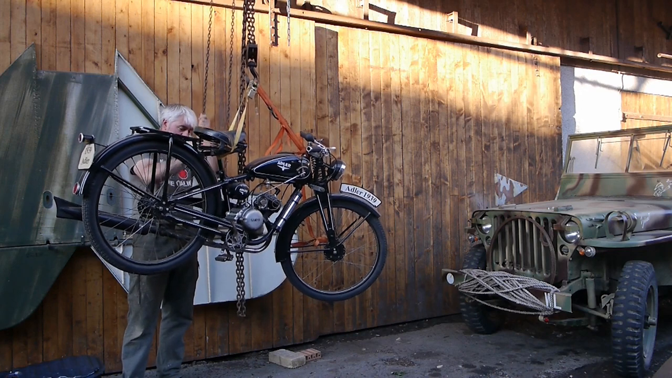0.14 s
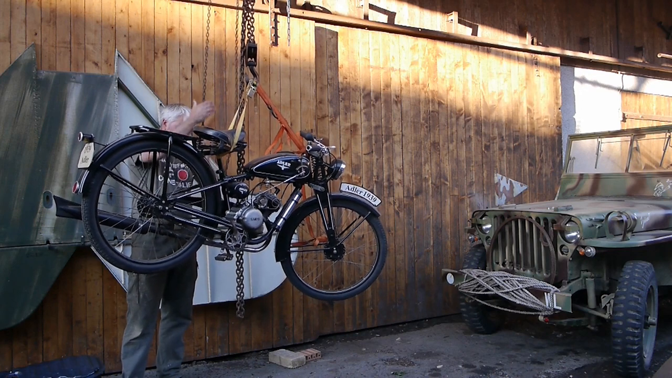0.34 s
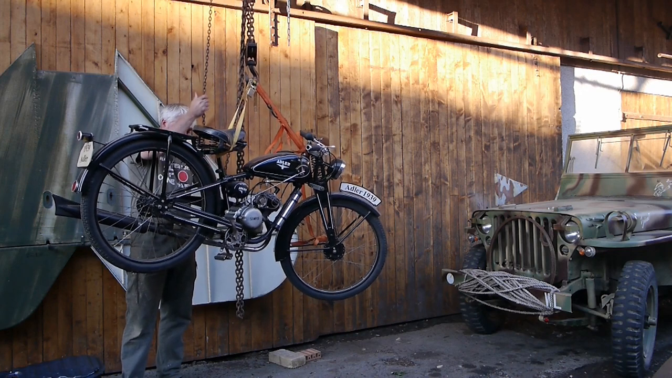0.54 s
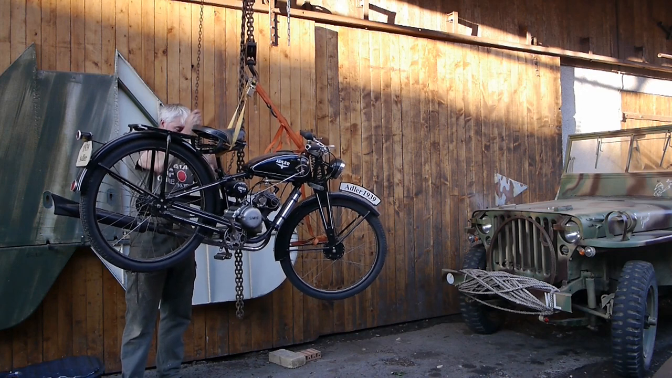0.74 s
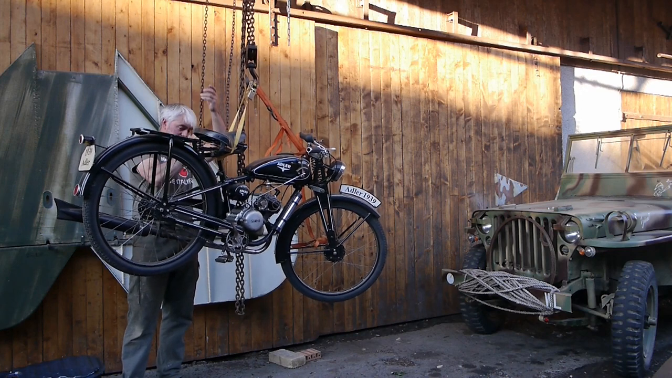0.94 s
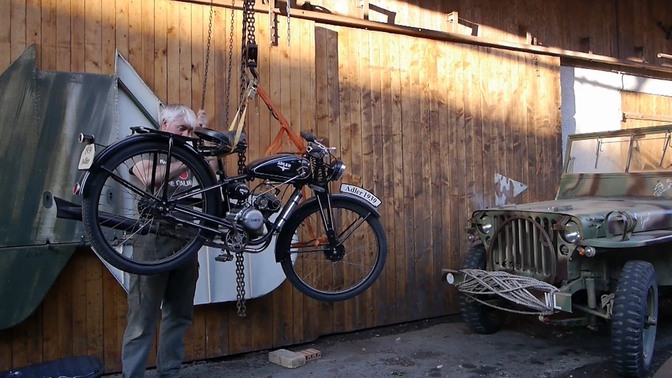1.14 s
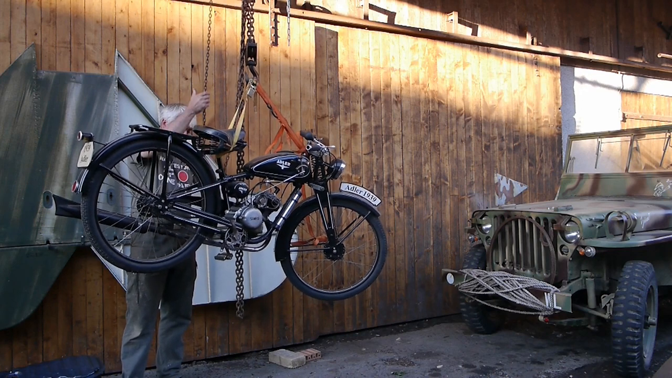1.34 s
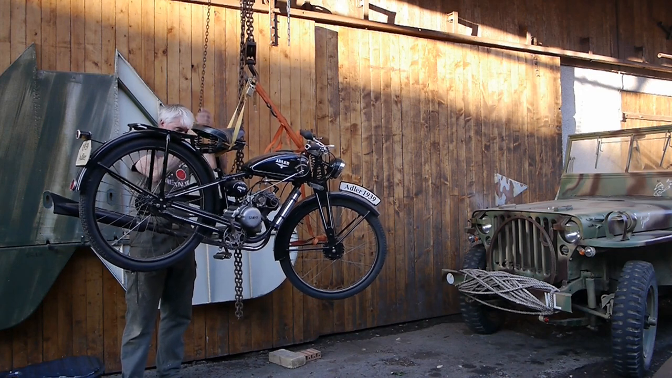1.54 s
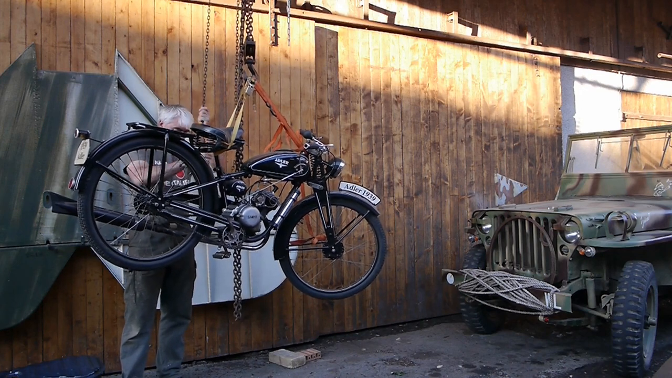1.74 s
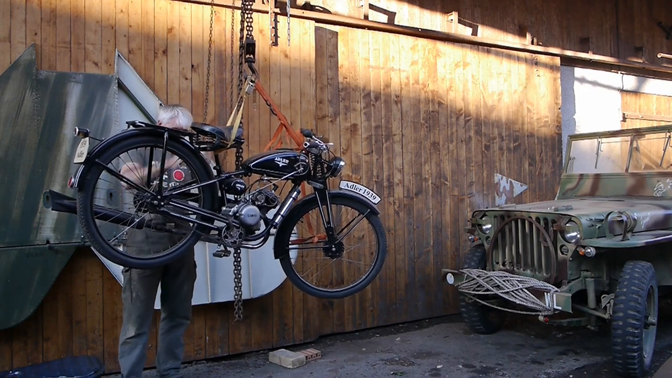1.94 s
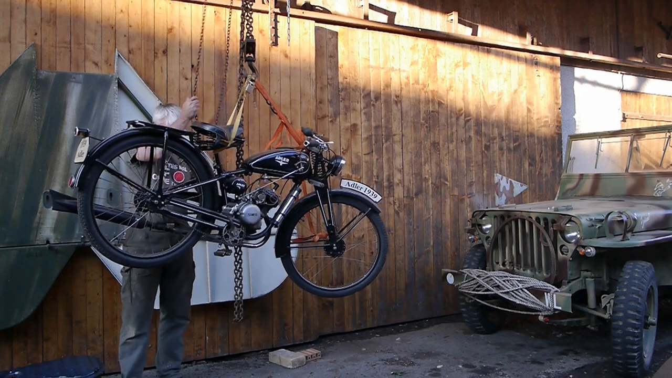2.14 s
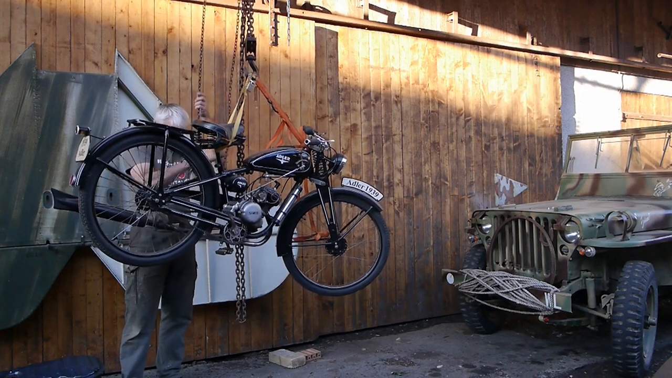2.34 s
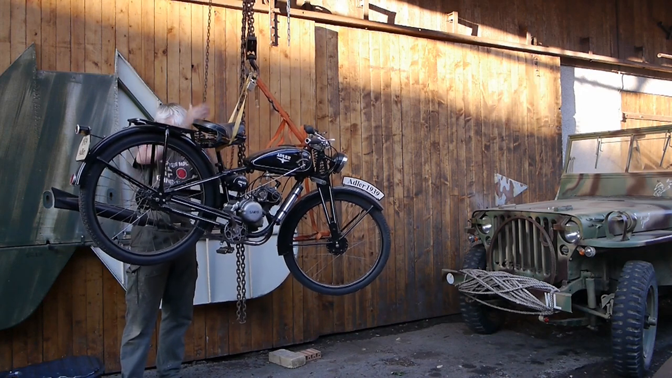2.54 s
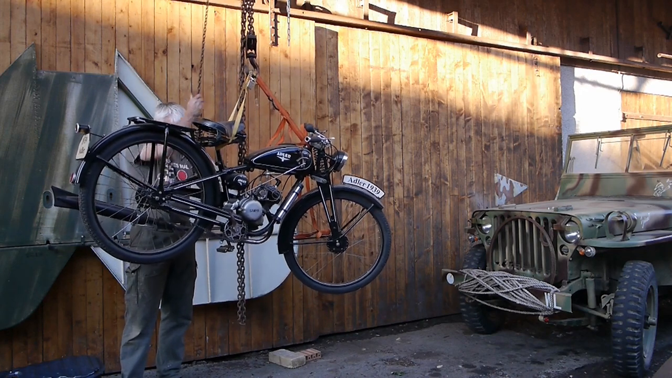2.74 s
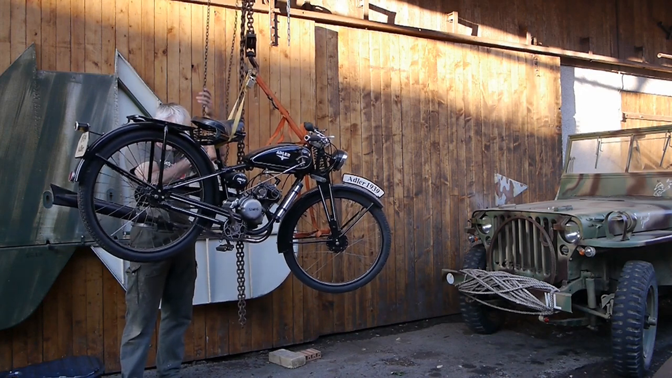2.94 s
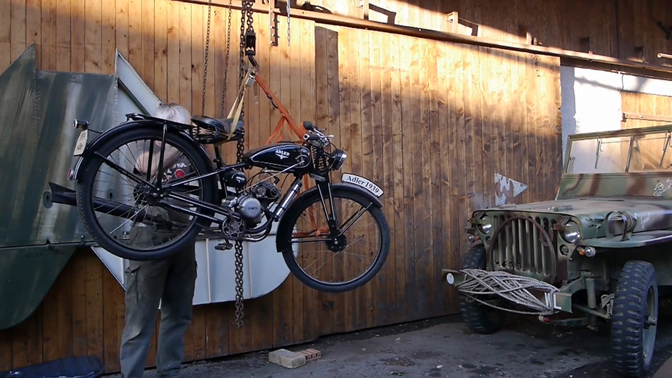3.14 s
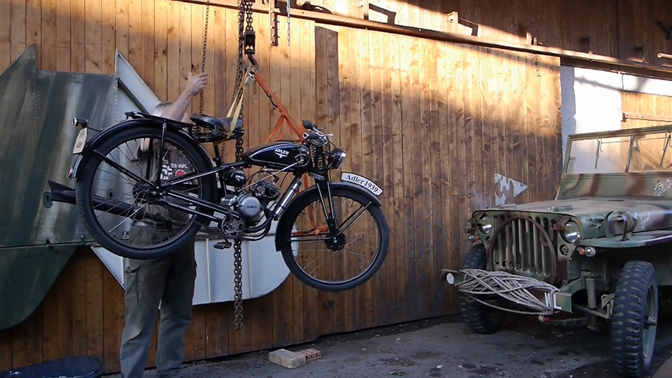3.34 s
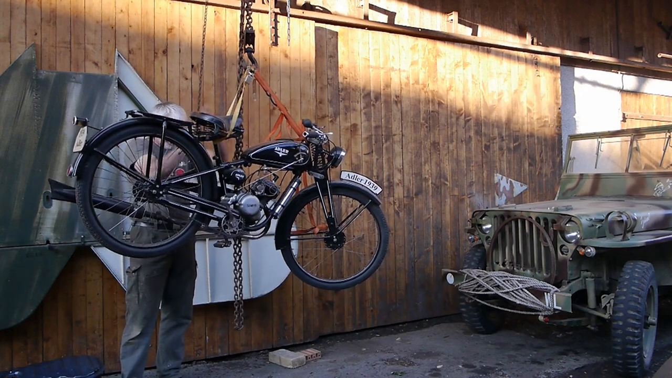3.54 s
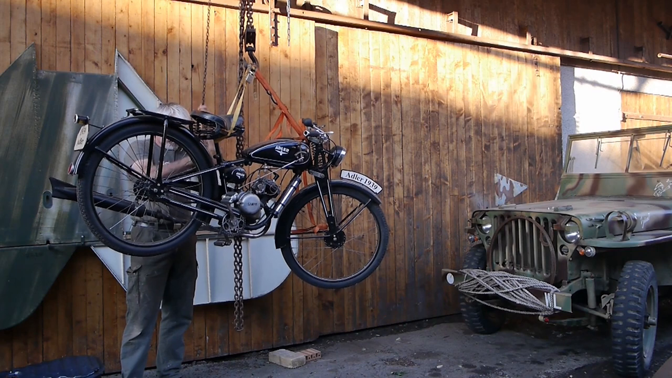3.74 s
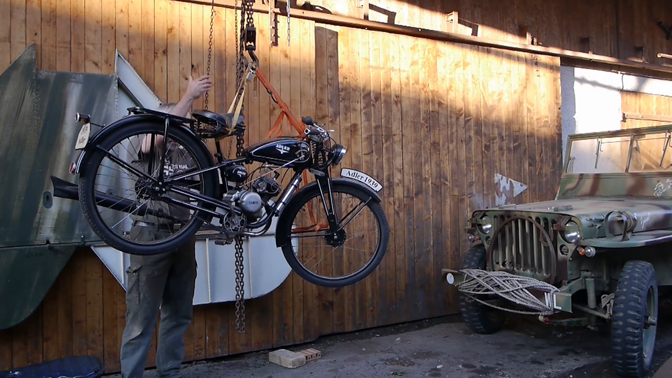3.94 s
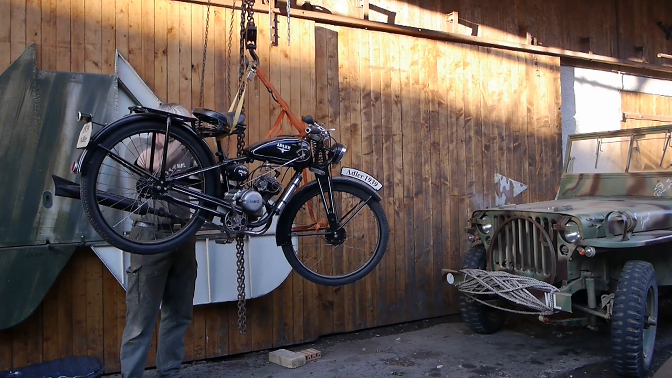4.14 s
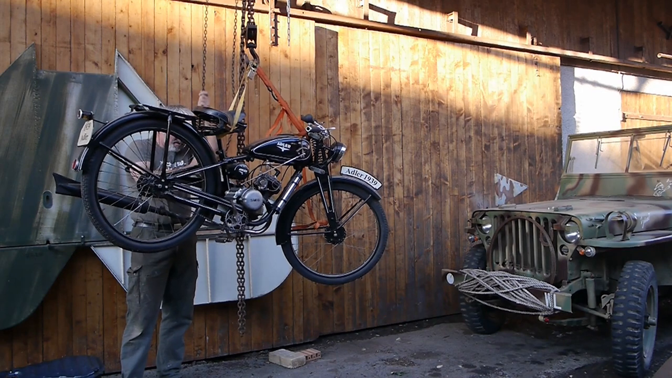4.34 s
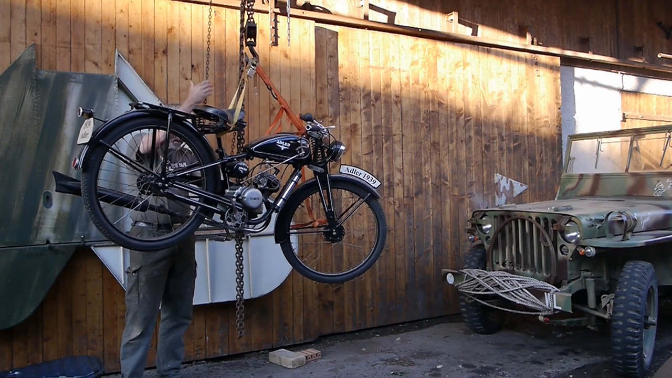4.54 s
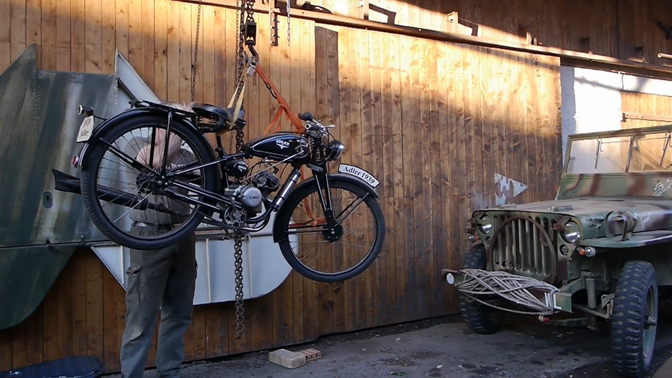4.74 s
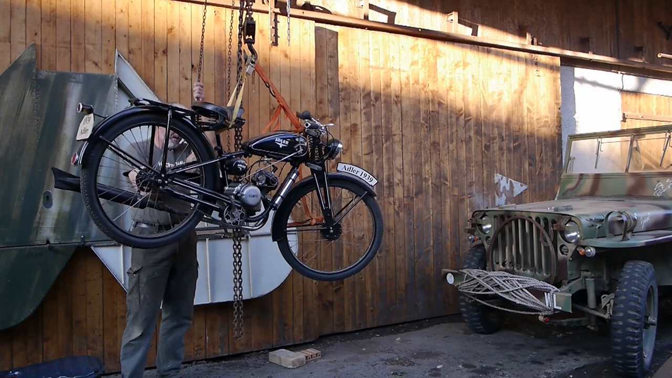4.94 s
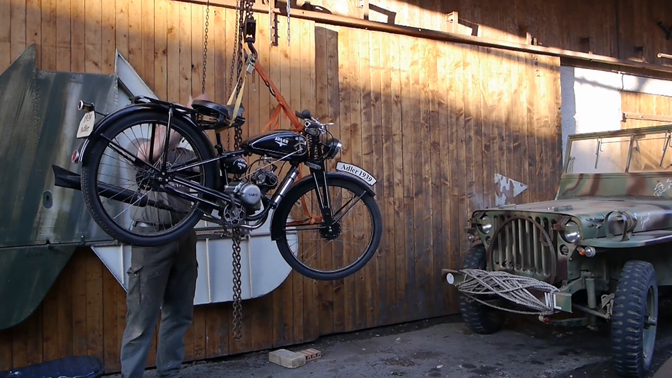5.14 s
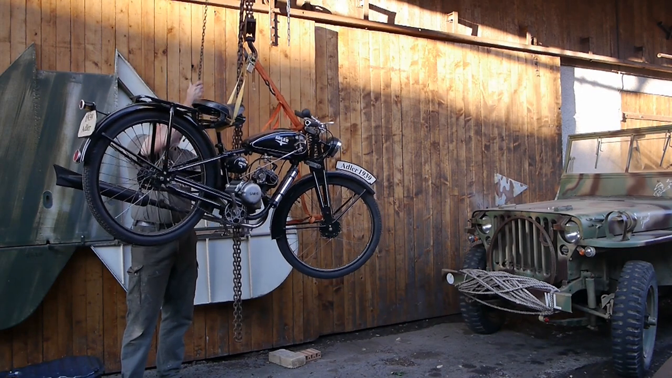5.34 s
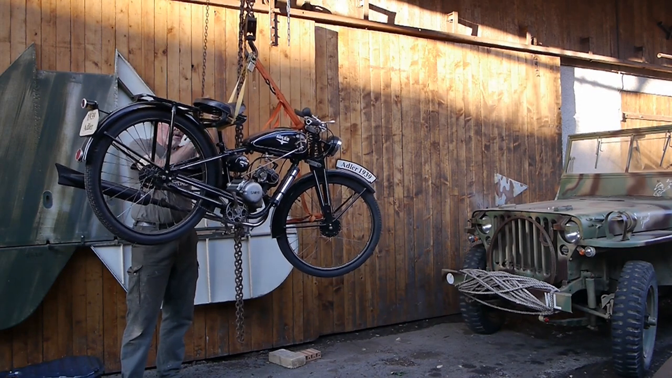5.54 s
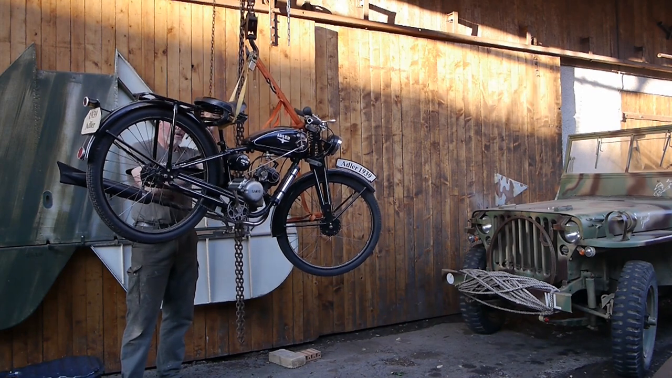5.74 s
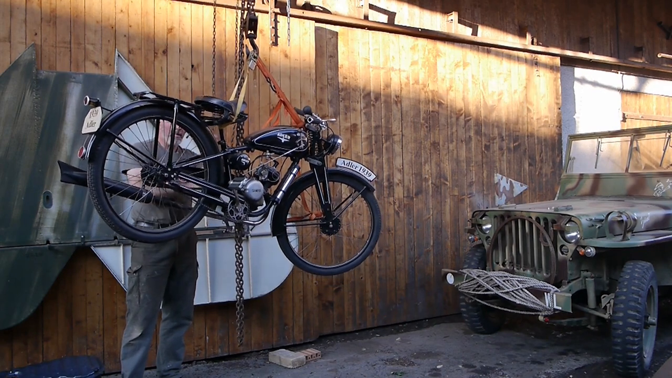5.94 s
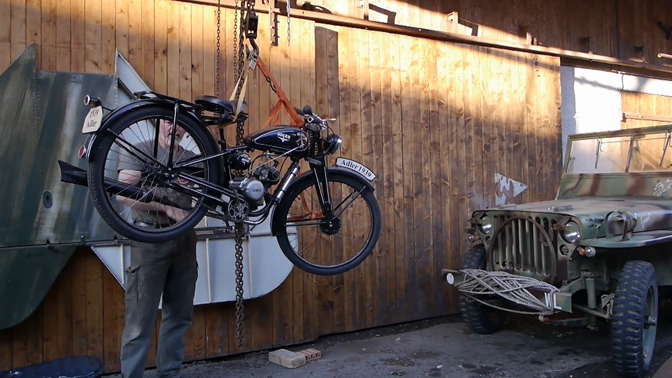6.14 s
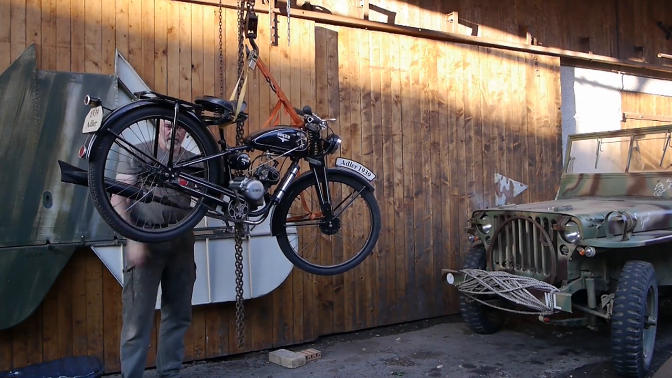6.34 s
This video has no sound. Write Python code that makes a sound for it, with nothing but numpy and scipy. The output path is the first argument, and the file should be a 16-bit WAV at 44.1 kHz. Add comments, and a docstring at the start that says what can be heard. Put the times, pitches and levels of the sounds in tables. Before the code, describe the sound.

A manual hoist clicks loudly at around fourteen teeth a second, each pawl drop a crisp crack with short steel ring and board reflections. Chain jingle and low gear rattle follow the pulling speed. Most of the lift is fast-forwarded: thinner, higher, roughly thirty clicks a second in surging bursts. Quick bird chirps poke through. A few heavier full-speed clicks end it, then quiet outdoor hush and one faint link tick.

```python
"""Hand chain hoist in an open timber shed

The pawl clicks over the ratchet wheel and chain links knock: noise bursts through ringing steel modes.
Links jingle and gears rumble: shaped noise that follows the wheel speed.
The middle of the lift plays at double speed: clicks and knocks there double in pitch and decay twice as fast,
and a faint low noise puff lies under each double-speed click.
A bird gives four quick chirps (gliding sines) over steady outdoor noise; a faint hum follows the last tooth."""
import sys
import numpy as np
from scipy import signal
from scipy.fft import rfft, irfft, next_fast_len
from scipy.io import wavfile
from scipy.ndimage import uniform_filter1d

SR = 44100
rng = np.random.default_rng(int(sys.argv[2]) if len(sys.argv) > 2 else 0)


def store_wav(level_fs):
    """Save 16-bit WAV to argv[1]."""
    pcm = np.round(np.clip(np.atleast_2d(level_fs), -1, 1) * 32767)
    wavfile.write(sys.argv[1], SR, pcm.T.astype(np.int16))


N = 286202
TOP_HZ = 15850  # band limit

# double-speed stretch: [start_s, end_s]
FAST_SPAN = (0.88, 5.745)

EDGE_DB_PER_OCT = -2  # a slow tooth drops with more edge
EDGE_SCATTER_DB, PAN_DB, PAN_SCATTER_DB = 1.38, 0.1, 0.56

# pawl drops: [start_s, relative level_db, extra body_db]
PAWL_DROPS = [(0.0014, -3, -1), (0.0889, -2, -1), (0.163, -3, 0), (0.2332, -3, 0.5), (0.2982, -1, 1),
              (0.3599, -1.5, -4), (0.4173, -3, -1), (0.4733, -2, -2.5), (0.5312, -4.5, -2), (0.608, -4, -1),
              (0.7306, -4, 0), (0.822, -2, 0.5), (0.9428, -7, 3), (1.0328, -7, 2), (1.1172, -7, 1),
              (1.1605, -5.5, -2), (1.1965, -7, 4), (1.2309, -5.5, -1.5), (1.263, -5, -2),
              (1.2933, -4.5, -5.5), (1.322, -5.5, -5), (1.3486, -8, -2.5), (1.3785, -8.5, -4),
              (1.4164, -6.5, -0.5), (1.4765, -7, 0), (1.5209, -6, -2), (1.5658, -6, 1.5), (1.6162, -5.5, 0),
              (1.6823, -6, -1), (1.7595, -7, 0.5), (1.8353, -6, -2.5), (1.8874, -8, 4), (1.926, -7, 1),
              (1.9577, -9, 0), (1.9838, -8, 1), (2.0128, -7.5, 2), (2.0413, -7.5, -1), (2.0733, -6.5, -1.5),
              (2.1102, -6.5, -2.5), (2.1993, -5, 0.5), (2.2458, -6.5, 0.5), (2.2776, -8, -0.5),
              (2.3077, -8, -4), (2.3396, -6, -1), (2.376, -6.5, 1), (2.4213, -7.5, -1), (2.5292, -7, 3),
              (2.5778, -5.5, -2), (2.614, -6, -1), (2.6485, -5.5, -1.5), (2.6797, -5, -1), (2.7104, -7, 1),
              (2.7391, -7.5, -1.5), (2.7735, -6.5, -3), (2.817, -8.5, 0.5), (2.8573, -6.5, 1),
              (2.8913, -7.5, 0), (2.9275, -7.5, 0.5), (2.9617, -6.5, -2), (2.9977, -6.5, -3.5),
              (3.0343, -5.5, -2), (3.0874, -8.5, 3), (3.1368, -8, 1), (3.1714, -8, 0.5), (3.2051, -8, -0.5),
              (3.2438, -7, -2.5), (3.2889, -6, 0), (3.333, -7.5, 1), (3.369, -8.5, 3.5), (3.4065, -6, 0),
              (3.4615, -4.5, -4), (3.502, -6.5, 3.5), (3.5329, -8, -4.5), (3.5616, -9, -2.5),
              (3.5898, -9.5, 0.5), (3.6178, -9.5, 1.5), (3.6478, -10, 5), (3.681, -7, 2.5),
              (3.7203, -6.5, -0.5), (3.7775, -7.5, 3), (3.8185, -8.5, 2), (3.8508, -5.5, -0.5),
              (3.8804, -8.5, 4.5), (3.909, -9, -0.5), (3.9362, -8, 3), (3.9668, -7, 1.5), (4.0008, -8.5, 1),
              (4.0445, -6, -2.5), (4.11, -7, 1), (4.154, -7.5, -2), (4.1894, -6, 0), (4.2217, -7, -1),
              (4.251, -8.5, 3.5), (4.2814, -7, -1.5), (4.3111, -9, -1), (4.3434, -6, -1), (4.3859, -9, 5),
              (4.426, -6, 0.5), (4.4574, -8.5, -4), (4.4847, -4, 0), (4.5119, -7.5, -4), (4.5418, -7.5, -1),
              (4.5742, -7.5, 0.5), (4.6102, -9, 2), (4.647, -7.5, 0), (4.6895, -6, 0.5),
              (4.7431, -7.5, 1.5), (4.78, -7, 5), (4.8134, -5.5, -5.5), (4.8435, -5.5, -2),
              (4.8727, -6, -4), (4.9025, -9.5, 0), (4.937, -7, 0), (4.9746, -9, 1.5), (5.016, -7, 2),
              (5.0676, -7, 1.5), (5.1083, -8.5, 2.5), (5.1467, -5.5, -2.5), (5.1849, -8, -0.5),
              (5.2255, -7.5, -1), (5.2791, -6.5, -1), (5.3269, -7, -0.5), (5.372, -6.5, 0.5),
              (5.4259, -7.5, 1), (5.473, -5.5, -2), (5.5138, -6, -2.5), (5.5497, -7, 0), (5.5856, -6, -1.5),
              (5.6201, -7.5, 2), (5.656, -7.5, 0.5), (5.6927, -7.5, 0.5), (5.739, -9, 2), (5.7633, -4, -3),
              (5.8418, -2.5, -2.5), (5.908, -4.5, 0.5), (5.9682, -2, -2), (6.0272, -4, -0.5),
              (6.105, -3.5, 2)]
# single link knocks: [start_s, relative level_db]
LINK_KNOCKS = [(0.0525, -16), (0.1253, -10), (0.1905, -8.5), (0.345, -2.5), (0.701, -19), (0.7865, -9),
               (0.8594, -11), (0.8717, -9), (2.4967, -38), (5.893, -6.5), (6.4093, -35)]
# pawl click spectrum: [freq_hz, relative density_db]
CLICK_COLOUR = [(35, -66), (60, -40), (256, -16.5), (417, -17), (469, -9.5), (842, -12), (903, -8),
                (1470, -9), (2410, -4), (5090, -3), (7230, -3.5), (12100, -8), (16000, -16)]


def ratchet(speed):
    """Pawl drops and link knocks heard at this playback speed; edge depends on wheel speed."""
    def at_this_speed(rows):
        in_fast = (rows[:, 0] > FAST_SPAN[0]) & (rows[:, 0] < FAST_SPAN[1])
        return rows[in_fast == (speed > 1)]

    start_s, level_db, body_db = np.transpose(PAWL_DROPS)
    _, pace_oct = wheel_speed()
    edge_luck, pan_luck = rng.standard_normal((2, len(start_s)))
    edge_db = EDGE_DB_PER_OCT * pace_oct + (0.5 if speed > 1 else -2.5) + EDGE_SCATTER_DB * edge_luck
    pan_db = PAN_DB + PAN_SCATTER_DB * pan_luck
    drops = np.transpose([start_s, level_db, body_db, edge_db, pan_db])
    knocks = np.pad(at_this_speed(np.array(LINK_KNOCKS, float)), ((0, 0), (0, 3)))
    pawl_db = -1.5 if speed > 1 else -4  # a short ring peaks lower
    clicks = amp(pawl_db) * blows(at_this_speed(drops), speed, CLICK_COLOUR, ring_db=7.5)
    return clicks + amp(-9.0) * blows(knocks, speed, JINGLE_COLOUR, ring_db=15)


# housing and wheel modes: [freq_hz, width_hz, relative level_db]
STEEL_MODES = [(1200, 110, -10), (1940, 250, -5.5), (2454, 95, -1.5), (2670, 88, -10.5), (2725, 81, -3),
               (3520, 170, -1.5), (4090, 95, -5), (4250, 120, -11.5), (4900, 110, -7), (5600, 203, -1.5),
               (6360, 91, -2.5), (7130, 92, -7.5), (7190, 240, 1.5), (7640, 140, -5), (8600, 160, 0),
               (9170, 105, 3.5), (9830, 210, 1.5), (10200, 460, -6), (12600, 1400, 3), (12900, 430, -9)]
# nearest boards: [delay_s, level_db]
WALL_ECHOES = [(.0040, -9.5), (.0062, -10), (.0095, -17), (0.013, -22.5), (.018, -14.5)]


def blows(rows, speed, colour, ring_db, size=16384):
    """Each blow: a crack with wall copies, a short rattle and the shed's tail, through ringing steel."""
    start_s, level_db, body_db, edge_db, pan_db = np.transpose(rows)[:, :, None]
    size //= speed
    t = np.arange(size) / SR * speed  # true seconds
    hz = np.fft.rfftfreq(size, 1 / SR)
    true_hz, shape = hz / speed, (len(rows), size)

    crack_fall = np.where(t < .0018, (.0018 - t) / .004, (t - .0018) / .006)
    crack = pair(shape, .95) * amp(-60 * crack_fall)
    crack = amp(15.5) * crack / np.linalg.norm(crack, axis=2, keepdims=True) / np.sqrt(speed)
    walls = 1
    for delay_s, wall_db in WALL_ECHOES:
        scatter_db = rng.normal(0, 0.77, (2, len(rows), 1))
        walls = walls + amp(wall_db + scatter_db) * np.exp(-2j * np.pi * true_hz * delay_s)
    sharp = np.sqrt(0.26 + (true_hz / 8000) ** 2)  # the first contact is the brightest

    rattle = pair(shape, 0.92) * amp(-4.5 - 60 * (t / 0.055) ** 1.33)
    rattle *= 1 - np.exp(-(t / .0055) ** 2)
    # many small rebounds
    grit = amp(1.67 * unit(uniform_filter1d(rng.standard_normal(shape), size=40 // speed)))

    swell = 1 - np.exp(-t / 0.0053)
    bright_tail = pair(shape, 0.36) * amp(-13.5 - 60 * t / 0.24) * swell
    dull_tail = pair(shape, 1.0) * amp(-14.5 - 60 * t / 0.41) * swell
    spectrum = rfft(crack) * walls * sharp + rfft(rattle * grit + bright_tail)
    spectrum = spectrum + rfft(dull_tail) / (1 + (true_hz / 2500) ** 2)

    # each blow strikes the modes a little differently, with random level and pitch
    strike_db = rng.normal(0, 2.8, (len(rows), len(STEEL_MODES)))
    detune = 1 + rng.normal(0, .012, strike_db.shape)
    modes = 0
    for k, (mode_hz, width_hz, mode_db) in enumerate(STEEL_MODES):
        offset = 2 * (true_hz - mode_hz * detune[:, [k]]) / width_hz
        modes = modes + amp(2 * (mode_db + strike_db[:, [k]])) / (1 + offset ** 2)

    tone_db = body_db * np.exp(-(hz / 6000) ** 4) + edge_db * (1 - np.exp(-(hz / 10000) ** 4))
    gain = amp(along(colour, true_hz) + tone_db) * case(true_hz) * np.sqrt(1 + amp(2 * ring_db) * modes)
    band = (hz > 2500) & (hz < TOP_HZ)
    band_rms = np.sqrt(np.mean(gain[:, band] ** 2, axis=1, keepdims=True))
    sound = irfft(spectrum * causal(gain / band_rms))
    sound = sound * amp(level_db + np.array([pan_db, -pan_db]) / 2)

    out = np.zeros((2, N + size))
    for k, start in enumerate(np.round(start_s[:, 0] * SR).astype(int)):
        out[:, start:start + size] += sound[:, k]
    return out[:, :N]


# hollow gear case resonances: [freq_hz, width_hz, level_db]
CASE_MODES = [(270, 24, 2.5), (398, 37, 10), (487.4, 17.4, 8.5), (559, 19, 7.5), (626, 15, 5.5)]


def case(hz):
    """Gain of the gear case: resonance powers added to a flat path."""
    peaks = sum(amp(2 * db) / (1 + (2 * (hz - mode_hz) / width_hz) ** 2)
                for mode_hz, width_hz, db in CASE_MODES)
    return np.sqrt(1 + peaks)


USUAL_TEETH_PER_S = 14


def wheel_speed():
    """Each tooth's time and the wheel speed before it, in octaves over the usual."""
    tooth_s = np.transpose(PAWL_DROPS)[0]
    in_fast = (tooth_s[1:] > FAST_SPAN[0]) & (tooth_s[:-1] < FAST_SPAN[1])
    gap_s = np.diff(tooth_s) * np.where(in_fast, 2, 1)  # true seconds
    cut = np.searchsorted(tooth_s, FAST_SPAN) - 1
    gap_s[cut] = gap_s[cut + 1]  # no tooth spacing across a change of playback speed
    return tooth_s, -np.log2(np.r_[gap_s[0], gap_s] * USUAL_TEETH_PER_S)


# levels at the usual wheel speed; both rise as it turns faster
JINGLE_DB, JINGLE_DB_PER_OCT = -32, 8
RUMBLE_DB, RUMBLE_DB_PER_OCT = -47.5, 6
STOP_DB_PER_S = 153  # fall after the last tooth
LAG_S = 0.02  # the chain follows the wheel's speed this late

# chain spectrum: [freq_hz, relative density_db]
JINGLE_COLOUR = [(1000, -22.5), (2500, -13), (5000, -8), (8000, -5), (12000, -4), (16000, -49)]
# gear train spectrum: [freq_hz, relative density_db]
GEAR_COLOUR = [(15, -51), (60, -44), (130, -13), (200, -3.5), (380, -6.5), (500, -6.5), (650, -3),
               (900, -23), (2000, -17)]


def haul(speed):
    """Links tick in a dense random patter while the gears rumble through their case."""
    tooth_s, pace_oct = wheel_speed()
    t = np.arange(N) / SR
    mid_gap_s = (tooth_s + np.r_[0, tooth_s[:-1]]) / 2
    pace_oct = np.interp(t - LAG_S, mid_gap_s, pace_oct)
    stop_db = -STOP_DB_PER_S * np.clip(t - tooth_s[-1], 0, None)
    ticks = (rng.random(N) < 250 * speed / SR) * amp(rng.normal(0, 2.2, N))
    patter = 0.14 + signal.fftconvolve(ticks, amp(-60 * t[:2000] * speed / 0.05))[:N]

    def chain_gain(hz):
        return amp(along(JINGLE_COLOUR, hz / speed)) * (hz < TOP_HZ)

    def gear_gain(hz):
        return amp(along(GEAR_COLOUR, hz / speed)) * case(hz / speed)

    jingle = unit(filtered(pair((N,), 0.46) * patter, chain_gain))
    rumble = unit(filtered(pair((N,), 1.0), gear_gain))
    jingle = amp(JINGLE_DB + JINGLE_DB_PER_OCT * pace_oct) * jingle
    rumble = amp(RUMBLE_DB + RUMBLE_DB_PER_OCT * pace_oct) * rumble
    return amp(stop_db) * (jingle + rumble)


def low_puffs():
    """A faint low noise puff of uneven strength under each double-speed click."""
    kicks = np.zeros(N)
    for start_s, level_db, _ in PAWL_DROPS:
        in_fast = FAST_SPAN[0] < start_s < FAST_SPAN[1]
        kicks[round(start_s * SR)] = amp(level_db + rng.normal(0, 1.5)) * in_fast
    t = np.arange(2000) / SR
    puffs = pair((N,), 0.77) * signal.fftconvolve(kicks, amp(-60 * t / 0.023))[:N]

    def low_band(hz):
        return 1 / (1 + (hz / 280) ** 2) / (1 + (25 / (hz + 1)) ** 2)

    return amp(-61.0) * unit(filtered(puffs, low_band))


SCOOP_HZ, SCOOP_S = 1400, .006  # start below top pitch; time constant of the rise

# chirps: [start_s, length_s, top_hz, rms level_db]
BIRD_CHIRPS = [(4.795, 0.024, 8900, -30), (4.852, 0.026, 9100, -30), (4.915, 0.035, 8900, -32),
               (4.986, 0.033, 8200, -32)]


def bird():
    """Four short whistles: sines scooping up exponentially towards their top pitch."""
    t, out = np.arange(N) / SR, np.zeros(N)
    for start_s, length_s, top_hz, level_db in BIRD_CHIRPS:
        age_s = np.clip(t - start_s, 0, None)
        fade = np.clip(np.minimum(age_s, length_s - age_s) / 0.0099, 0, 1)
        pitch_hz = top_hz - SCOOP_HZ * np.exp(-age_s / SCOOP_S)
        out += fade * np.sqrt(2) * amp(level_db) * np.sin(2 * np.pi * np.cumsum(pitch_hz) / SR)
    return out


# hum bands: [freq_hz, width_hz, level_db]
HUM_BANDS = [(723, 30, -61), (1060, 120, -57.5)]


def hum():
    """Two narrow noise bands, wavering, that rise over 0.1 s after the last tooth."""
    rise = np.clip((np.arange(N) / SR - PAWL_DROPS[-1][0]) / .1, 0, 1)
    total = 0
    for centre_hz, width_hz, level_db in HUM_BANDS:
        band = filtered(pair((N,), .8), lambda hz: 1 / (1 + (2 * (hz - centre_hz) / width_hz) ** 2))
        total = total + amp(level_db) * unit(band)
    return rise * total


AIR_DB = -47.5

# yard spectrum: [freq_hz, relative density_db]
AIR_COLOUR = [(20, -50), (60, -33), (170, -19), (250, -9), (450, -6), (600, -9.5), (730, -3), (860, -9.5),
              (1050, -4), (1300, -9.5), (2300, -14.5), (3300, -10), (5000, -15.5), (15500, -31)]


def yard(speed):
    """The steady outdoor hush: wide stereo noise, spectrum scaled by speed."""
    return amp(AIR_DB) * unit(filtered(pair((N,), 0.15), lambda hz: amp(along(AIR_COLOUR, hz / speed))))


def amp(db):
    """dB to gain."""
    return 10 ** (np.asarray(db) / 20)


def unit(x):
    """Scaled to rms 1."""
    return x / np.sqrt(np.mean(x ** 2) + 1e-20)


def along(points, hz):
    """Interpolate (freq_hz, value) points on a log frequency axis."""
    point_hz, value = np.transpose(points)
    return np.interp(np.log(hz + 1), np.log(point_hz + 1), value)


def filtered(x, response):
    """x times a response of frequency, zero-padded."""
    m = next_fast_len(N + 8192)
    return irfft(rfft(x, m) * response(np.fft.rfftfreq(m, 1 / SR)), m)[..., :N]


def causal(gain):
    """Minimum-phase response with these gains, by folding the cepstrum."""
    cepstrum = irfft(np.log(gain + 1e-6))
    half = cepstrum.shape[-1] // 2
    cepstrum[..., 1:half] *= 2
    cepstrum[..., half + 1:] = 0
    return np.exp(rfft(cepstrum))


def pair(shape, alike):
    """Left and right noise with correlation alike."""
    a, b = rng.standard_normal((2, *shape))
    turn = np.arccos(np.clip(alike, 0, 1)) / 2
    return np.array([np.cos(turn) * a + np.sin(turn) * b, np.cos(turn) * a - np.sin(turn) * b])


def scene():
    """Normal and double-speed stretches, butted together with short bed crossfades."""
    t = np.arange(N) / SR
    fast = np.clip(np.minimum(t - FAST_SPAN[0], FAST_SPAN[1] - t) / 0.012, 0, 1)
    beds = (1 - fast) * (haul(0.94) + yard(0.95)) + fast * (haul(2) + yard(1.84))
    clicks = (1 - fast) * ratchet(1) + ratchet(2)
    return beds + clicks + low_puffs() + bird() + hum()


def record(dry):
    """Two-port microphone: left leads a little in phase and is louder; band-limited."""
    dry = dry / (1 + np.abs(dry / .95) ** 6) ** (1 / 6)  # the preamp rounds off the highest peaks
    lead_rad = 0.5  # approached at high frequency

    def ports(hz):
        phase_rad = .5 * lead_rad * hz / (hz + 400) * np.array([[1], [-1]])
        return amp([[.3], [-.3]]) * np.exp(1j * phase_rad) * (hz < TOP_HZ)

    return filtered(dry, ports)


dry = scene()
out = record(dry)
store_wav(out)
```